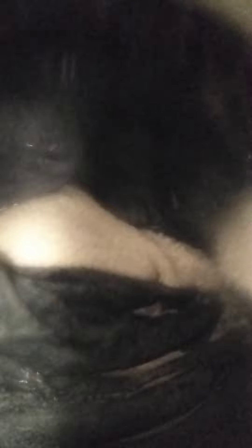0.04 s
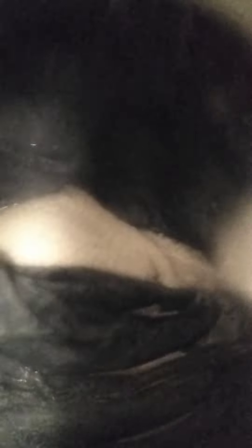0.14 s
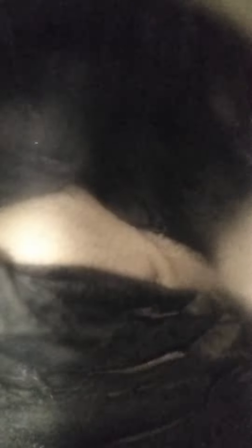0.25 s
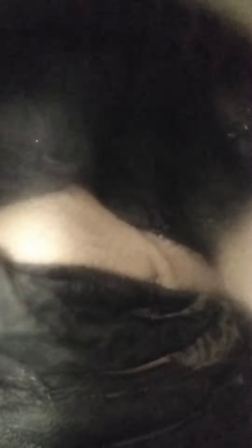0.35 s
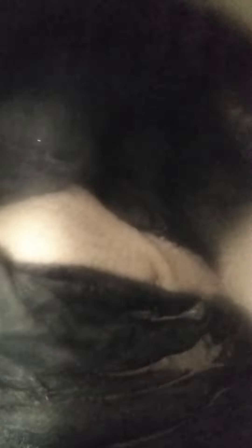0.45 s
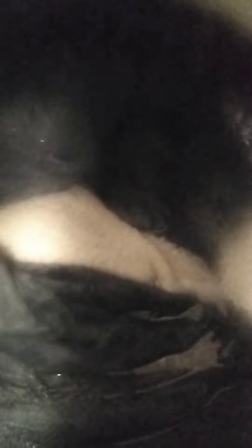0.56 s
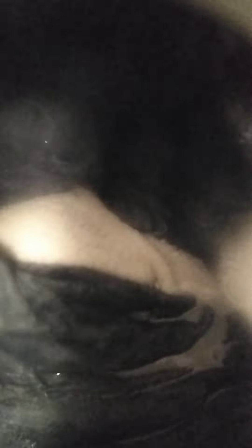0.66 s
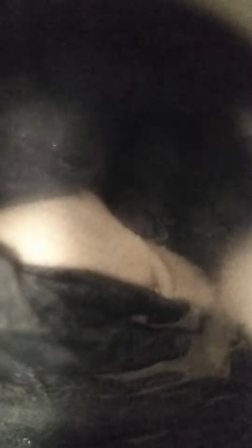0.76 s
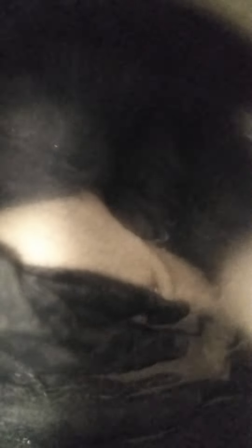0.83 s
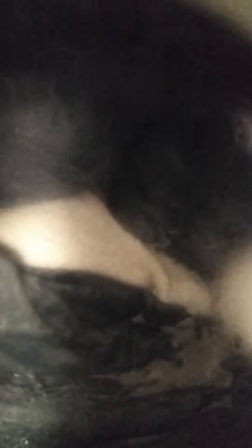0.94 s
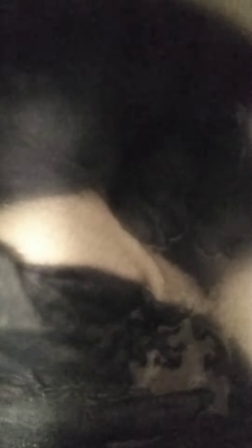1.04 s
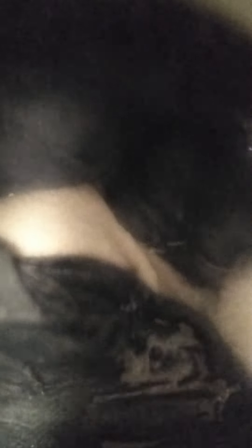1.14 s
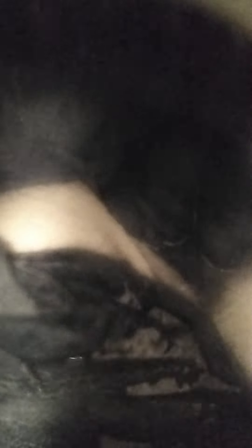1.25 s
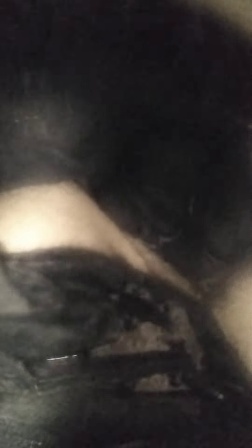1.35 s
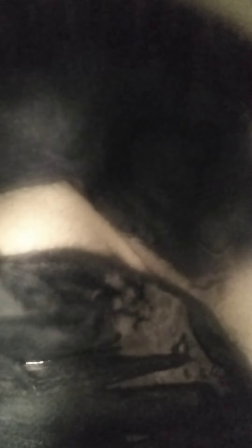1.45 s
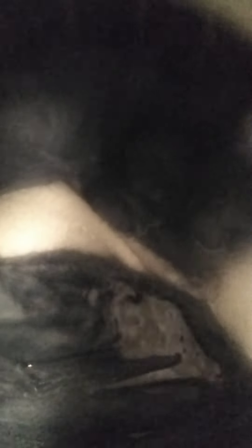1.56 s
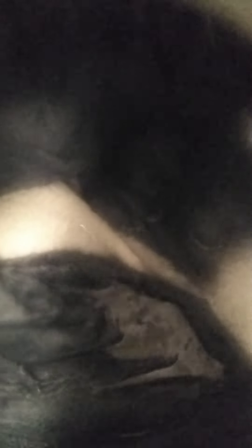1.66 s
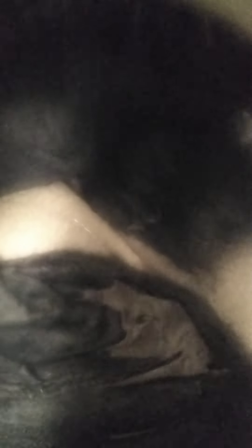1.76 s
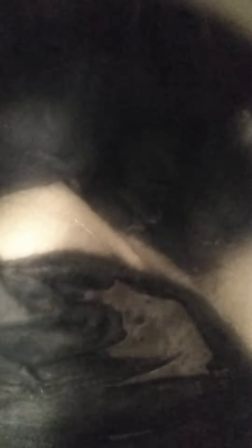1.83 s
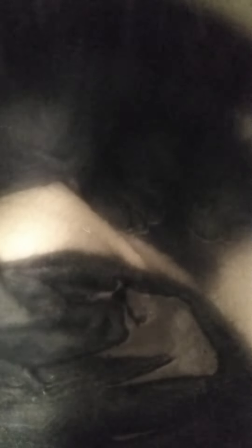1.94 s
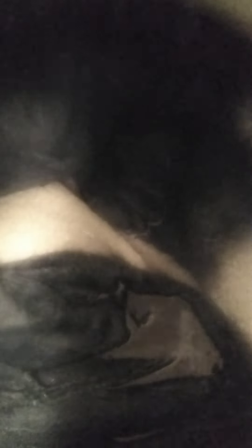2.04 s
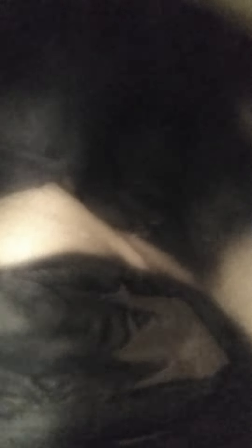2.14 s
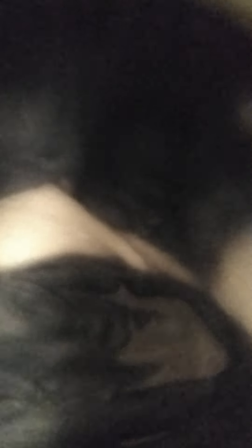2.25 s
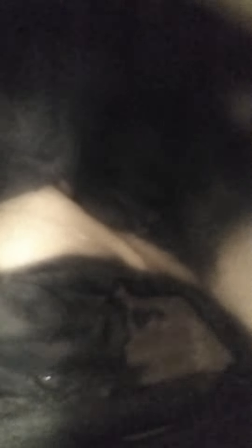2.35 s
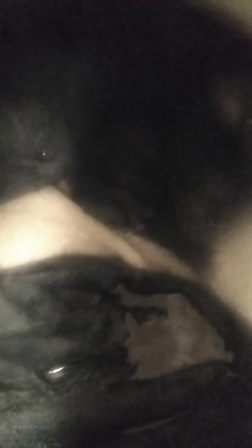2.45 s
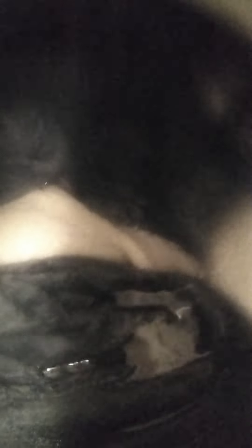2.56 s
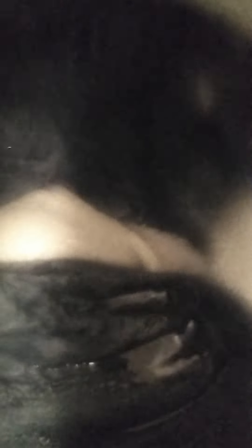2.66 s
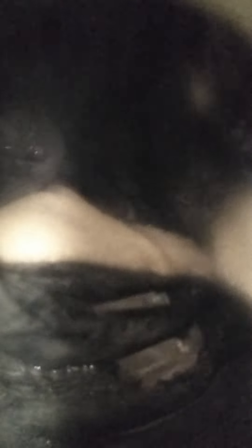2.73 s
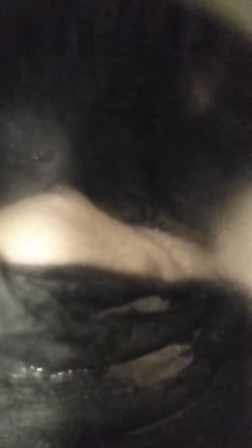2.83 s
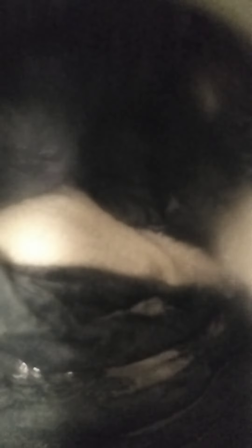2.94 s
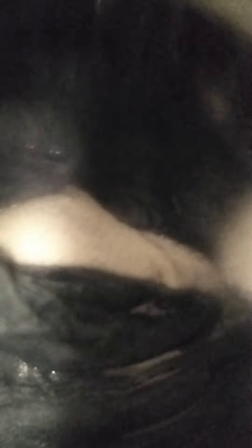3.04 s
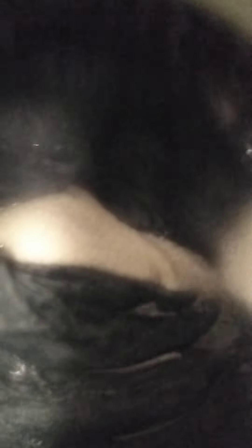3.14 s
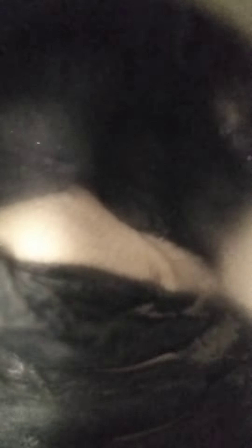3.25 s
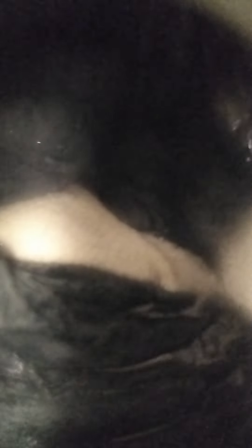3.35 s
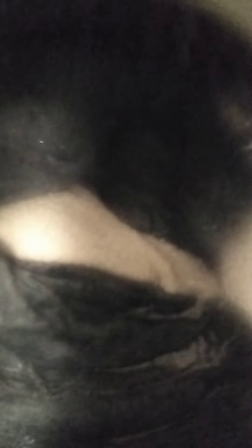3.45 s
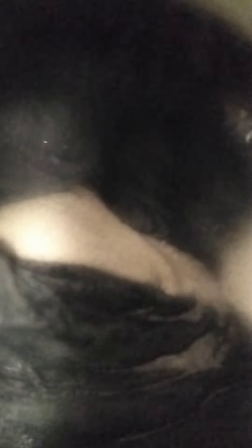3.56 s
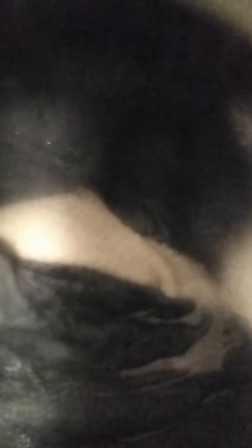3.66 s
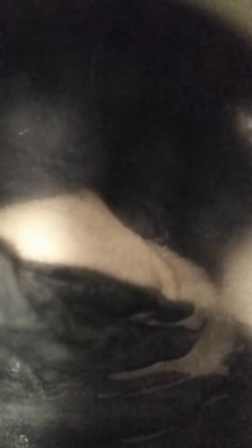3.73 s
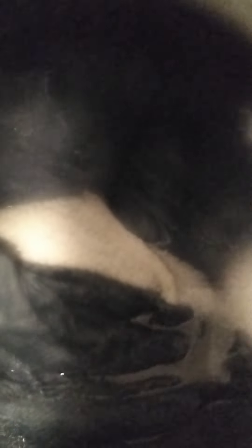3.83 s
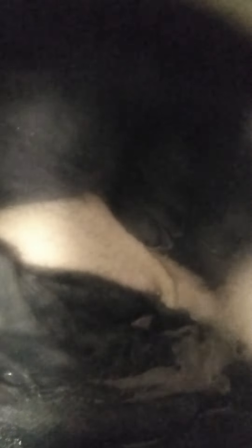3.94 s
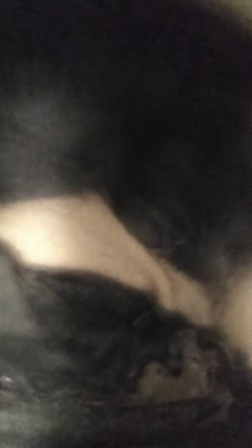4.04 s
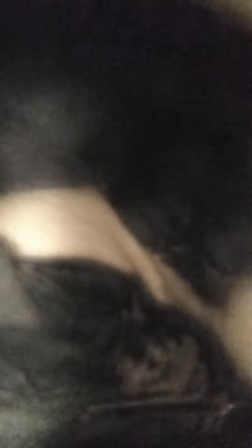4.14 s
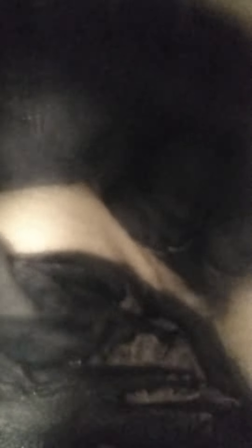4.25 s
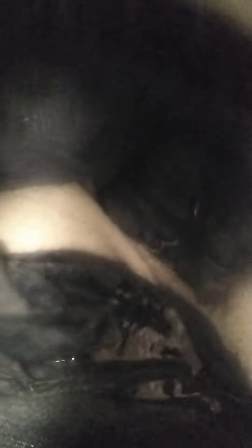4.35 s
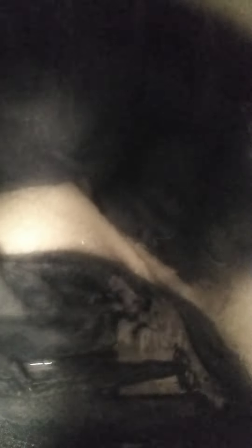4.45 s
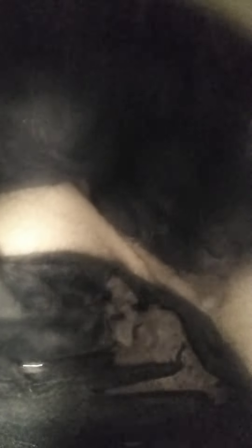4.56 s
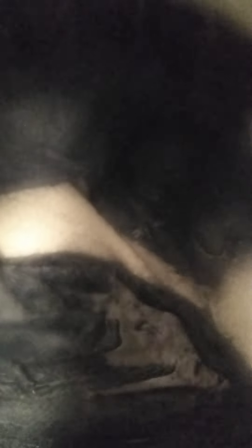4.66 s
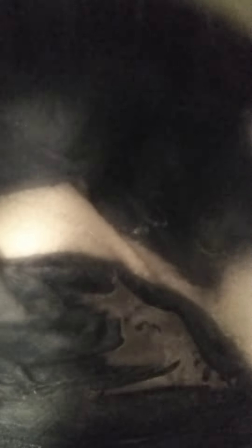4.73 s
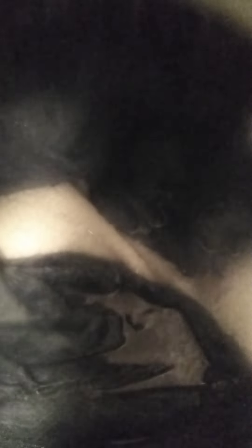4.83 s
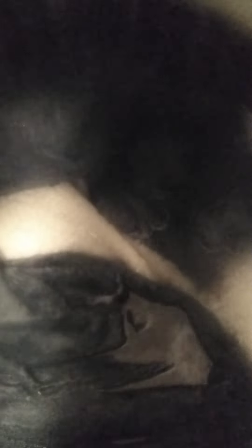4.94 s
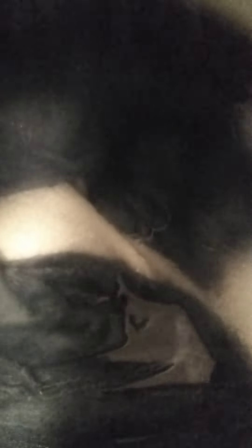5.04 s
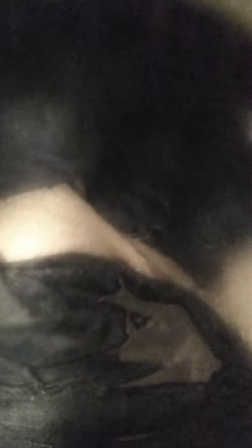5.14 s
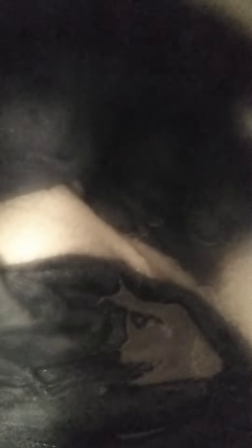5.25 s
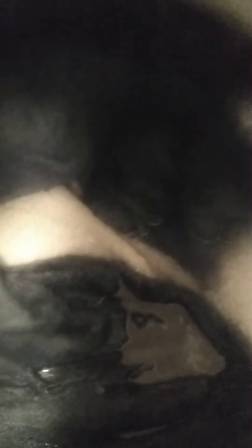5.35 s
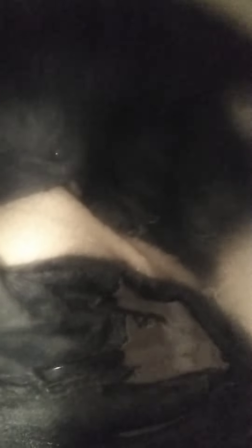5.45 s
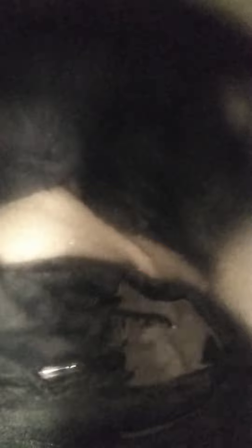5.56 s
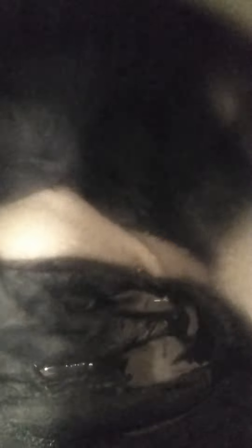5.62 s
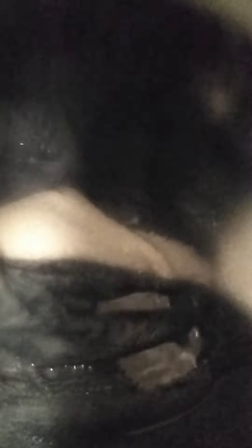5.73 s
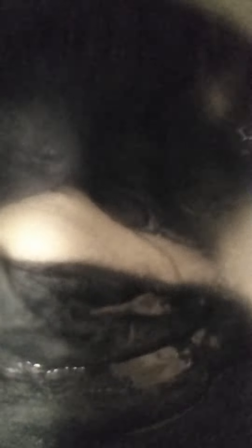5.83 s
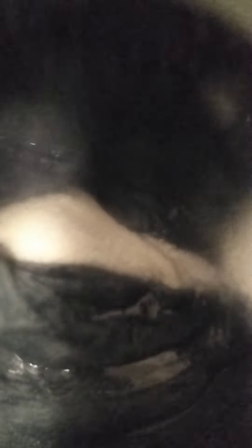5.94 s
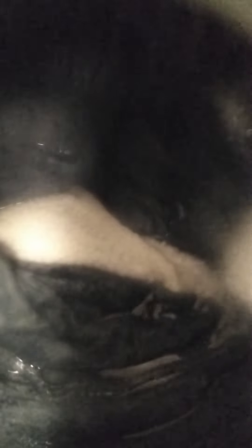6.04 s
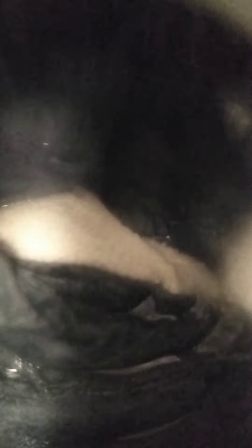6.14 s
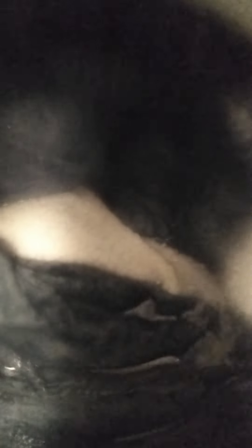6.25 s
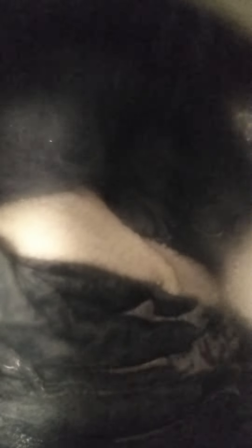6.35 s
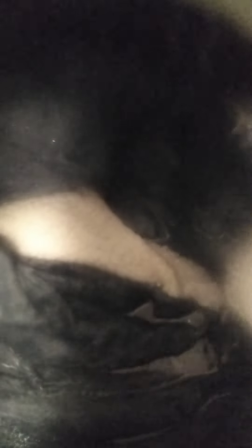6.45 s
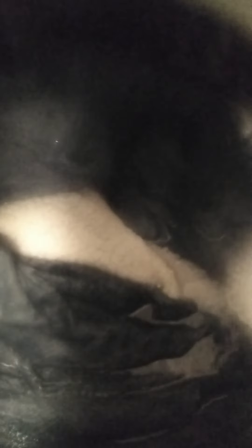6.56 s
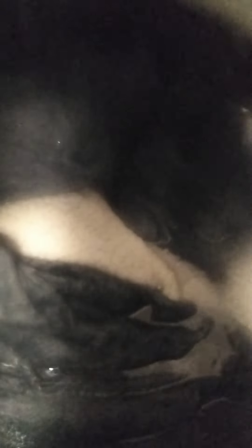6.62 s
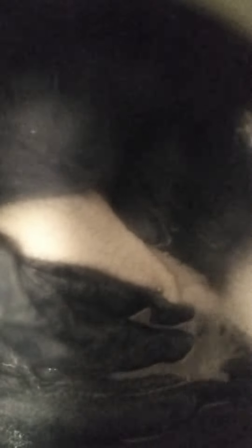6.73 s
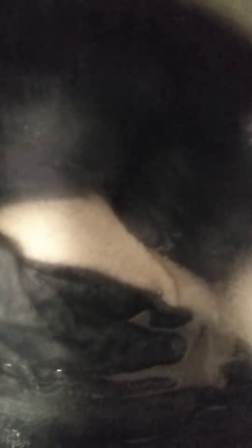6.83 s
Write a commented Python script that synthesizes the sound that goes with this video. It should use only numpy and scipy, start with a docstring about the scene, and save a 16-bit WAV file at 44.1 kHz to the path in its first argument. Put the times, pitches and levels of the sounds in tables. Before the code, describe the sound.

A washing machine agitates a wet blanket in regular strokes, its motor whirring and hooting between knocks while water churns and drips.

```python
"""A top-loading washer agitates a wet blanket, heard from just above the tub. Every 1.5 s the drive
takes up its slack with a few clacks, runs up to a hum that booms and hoots in the tub, coasts and hits
its stop as the load swings on. Belt and gears whirr; water churns, splashes and drips as ringing bubbles.
The inverter whistles while it drives, and the mains hums throughout over a faint room hiss.
Tub resonances and reflections off the steel drum colour most of the sounds."""
import sys
import numpy as np
from scipy import signal
from scipy.fft import rfft, irfft, next_fast_len
from scipy.io import wavfile
from scipy.ndimage import uniform_filter1d

SR = 44100
rng = np.random.default_rng(int(sys.argv[2]) if len(sys.argv) > 2 else 0)


def log_audio(samples):
    """Write samples as a 16-bit WAV file to the path given in sys.argv[1]."""
    # one column per channel
    frames = np.atleast_2d(samples).T
    # limit to full scale, then quantise
    limited = np.clip(frames, -1, 1)
    pcm = np.round(limited * 32767).astype(np.int16)
    wavfile.write(sys.argv[1], SR, pcm)


N = 303849
T = np.arange(N) / SR
FFT_SIZE = 2 * next_fast_len(N // 2 + 16384)
FREQS = np.maximum(np.arange(FFT_SIZE // 2 + 1) * SR / FFT_SIZE, 1)


def undb(db):
    """Decibels to gain."""
    return 10 ** (np.asarray(db) / 20)


def pan(db):
    """Stereo gains for a left-minus-right level difference."""
    return undb(np.array([[db], [-db]]) / 2)


def curve_db(points):
    """Join (Hz, dB) points on a log-frequency axis."""
    hz, db = np.transpose(points)
    return np.interp(np.log(FREQS), np.log(hz), db)


def peak(hz, width_hz):
    """Resonance curve of unit height."""
    return 1 / (1 + (2 * (FREQS - hz) / width_hz) ** 2)


def min_phase(db):
    """Causal filter with the given gain."""
    cepstrum = irfft(np.log(undb(db)))
    cepstrum[..., 1:FFT_SIZE // 2] *= 2
    cepstrum[..., FFT_SIZE // 2 + 1:] = 0
    return np.exp(rfft(cepstrum))


def colour(points):
    """Causal filter through (Hz, dB) points."""
    return min_phase(curve_db(points))


def filtered(x, gain):
    """Apply a frequency response."""
    return irfft(rfft(x, FFT_SIZE) * gain)[..., :N]


def shape(x, gain, band_hz):
    """Filter x, scaled so that unit white noise has unit level inside the band."""
    inside = (FREQS > band_hz[0]) & (FREQS < band_hz[1])
    power = np.mean(np.abs(gain) ** 2 * inside)
    return filtered(x, gain) / np.sqrt(power)


def walk(rate_hz):
    """Random steps, smoothed twice; spread near 1."""
    hold = int(SR / rate_hz)
    steps = np.repeat(rng.standard_normal(N // hold + 1), hold)
    return 1.3 * uniform_filter1d(uniform_filter1d(steps, hold), hold)[:N]


def noise(shared):
    """Stereo white noise with a share of its power in common."""
    return np.sqrt(shared) * rng.standard_normal(N) + np.sqrt(1 - shared) * rng.standard_normal((2, N))


def gate(start_s, end_s, fade_s):
    """Window with linear fades."""
    return np.clip((T - start_s) / fade_s, 0, 1) * np.clip((end_s - T) / fade_s, 0, 1)


def swell(centre_s, spread_s):
    """Gaussian envelope of unit height."""
    return np.exp(-((T - centre_s) / spread_s) ** 2)


def blows(times_s, levels_db, rise_s, t60_s, tail_db, tail_t60_s):
    """Envelope of blows, summed in power: quick rise, short ring, longer room tail."""
    t = T[:SR]
    decay = undb(-60 * t / t60_s) + undb(tail_db - 60 * t / tail_t60_s)
    blow = (1 - np.exp(-t / rise_s)) * decay
    power = np.zeros(N + SR)
    for start_s, db in zip(times_s, levels_db):
        i = int(start_s * SR)
        power[i:i + SR] += (undb(db) * blow) ** 2
    return np.sqrt(power[:N])


# Each row: frequency in Hz, width in Hz, left lift in dB, right lift in dB.
TUB_RESONANCES = [(95, 84, -0.5, 1.5), (199.6, 33, 9, -6), (295.5, 62, -2, 11), (335.4, 9, 0.5, 7.5),
                  (376.7, 40, 9, 6.5), (491, 180, 2, 6.5), (565, 63, 0, -1), (641, 17, -5, -11.5),
                  (688.5, 55, 5, 8), (797, 55, 1, 4), (989.2, 69, 2, 3.5), (1091, 90, 5, 7),
                  (1230, 9.6, 5, -10), (1448, 42, -2, 5.5), (1957, 76, 9, 2), (2452, 50, 9, 1),
                  (2660, 25, 7.5, 2.5), (3630, 74, 2.5, 2), (6330, 600, -6, 3)]

def tub_response(right_lag_s=0.00021):
    """Resonances of tub and cabinet; sound reaches the right side slightly later."""
    lift_db = sum(np.outer([left, right], peak(hz, width)) for hz, width, left, right in TUB_RESONANCES)
    return min_phase(lift_db) * np.exp(-2j * np.pi * np.outer([0, right_lag_s], FREQS))


def drum_echo(echo_db, t60_s, highpass_hz):
    """Direct sound plus dense treble reflections off the steel drum."""
    t = T[:SR // 2]
    tail = rng.standard_normal((2, len(t))) * undb(-60 * t / t60_s) * (t > 0.002)
    tail *= undb(echo_db) / np.sqrt(np.sum(tail ** 2) / 2)
    return 1 + rfft(tail, FFT_SIZE) / (1 + (highpass_hz / FREQS) ** 4)


# Each row: frequency in Hz, gain in dB.
HISS_SPECTRUM = [(25, 10), (60, 24.5), (190, 18.5), (285, 11), (320, 26), (355, 4), (450, 8), (800, 2),
                 (2000, -1.5), (6000, 1), (8500, -1), (12000, 0), (15500, -8)]
# Each row: frequency in Hz, left minus right in dB.
HISS_PAN = [(200, 2.5), (2500, 0), (7500, 1), (10000, 7.5), (15000, 7)]

def room_hiss(tub, level_db=-83):
    """Faint hiss of a quiet room, coloured by the open tub."""
    gain_db = curve_db(HISS_SPECTRUM) + np.outer([0.5, -0.5], curve_db(HISS_PAN))
    return shape(noise(shared=0.04), tub * undb(gain_db), band_hz=(8000, 14000)) * undb(level_db)


def mains_hum(hum_hz=121, level_db=-69):
    """Continuous mains hum, wavering slightly in pitch and level."""
    phase = 2 * np.pi * np.cumsum(hum_hz + 2.5 * walk(14)) / SR
    return np.sin(phase) * undb(level_db + 1.1 * walk(33)) * pan(3)


# Each row: start in seconds, level in dB.
WATER_SLAPS = [(0.06, -75.5), (0.109, -77), (1.203, -72.5), (1.248, -68.5), (1.34, -75.5), (1.592, -82),
               (2.68, -75), (2.786, -72), (2.865, -77.5), (3.065, -78), (3.114, -82), (3.372, -64),
               (4.256, -68.5), (4.47, -73.5), (4.624, -81), (5.655, -75), (5.721, -73), (5.783, -73.5),
               (5.852, -67.5), (5.899, -70.5), (6.102, -77)]
# Each row: frequency in Hz, gain in dB.
SPLASH_SPECTRUM = [(300, -19.5), (900, 3), (1600, 4.5), (2500, -2), (4000, 1.5), (6500, -5.5), (8500, -10),
                   (15000, -26.5)]

def splashes(drum, crackle_db=5, wash_db=-76, wash_after_s=0.7):
    """Water slaps off the blanket and crackles; a softer wash follows as the motor slows."""
    slap_s, slap_db = np.transpose(WATER_SLAPS)
    slaps = blows(slap_s, slap_db, rise_s=0.0055, t60_s=0.24, tail_db=-17.5, tail_t60_s=0.6)
    wash = sum(swell(start_s + wash_after_s, 0.16) for start_s in STROKE_STARTS_S) * undb(wash_db)
    spatter = noise(shared=0.24) * undb(crackle_db * walk(500)) * np.hypot(slaps, wash)
    return shape(spatter, drum * colour(SPLASH_SPECTRUM), band_hz=(1000, 8000)) * pan(-7)


def bubble(hz, cycles, glide=0.035):
    """A tiny bubble swells in, rings and rises in pitch as it dies."""
    t = T[:2048]
    age = np.minimum(t * hz / cycles, 1)
    phase = 2 * np.pi * np.cumsum(hz * (1 + glide * age)) / SR
    envelope = (1 - np.exp(-t * hz / 3)) * undb(-60 * age) * (age < 1)
    return np.sin(phase) * envelope


# Each row: start in seconds, relative level in dB, pitch in Hz.
DROPS = [(0.16, -55, 2840), (0.4201, -58.5, 6150), (0.932, -53.5, 6284), (1.127, -49.5, 6600),
         (1.205, -48.5, 3450), (1.209, -57, 5170), (1.249, -53, 4900), (1.305, -47, 3350),
         (1.3443, -52, 5140), (1.6214, -53, 3140), (2.438, -53, 6130), (2.4432, -51, 3298),
         (2.4843, -51.5, 5610), (2.6768, -50, 5300), (2.7237, -52, 5700), (2.755, -50.5, 6400),
         (2.781, -50, 5730), (3.0988, -56, 5800), (3.1288, -58.5, 3570), (3.9798, -54, 5096),
         (4.2113, -59, 6400), (4.2363, -51, 5300), (4.256, -53, 5950), (4.265, -50, 3720),
         (4.437, -59, 3320), (4.4892, -55, 3623), (5.515, -50, 3910), (5.655, -51, 2950),
         (5.7178, -47, 3570), (5.806, -55, 4000), (5.8591, -48.5, 4050), (6.108, -63, 2960)]

def drips(gain_db=-6, drop_pan_db=-11.5, spray_s=0.019, fizz_s=0.071, trickle_after_s=0.83, fine_hz=3570):
    """Drops ping and throw a spray of bubbles; slaps fizz, and a fine trickle follows each stroke."""
    bubbles = []  # start in s, level in dB, pitch in Hz, pan in dB, cycles
    for start_s, db, hz in DROPS:
        bubbles.append((start_s, db, hz, drop_pan_db, 30))
        for wait, pitch in rng.random((16, 2)):
            spray_hz = min(hz * 2 ** (1.3 * (pitch - 0.4)), 7000)
            bubbles.append((start_s + spray_s * wait ** 2, db - 9, spray_hz, drop_pan_db, 12))
    for start_s, db in WATER_SLAPS:
        for wait, size, pitch in np.clip(rng.standard_normal((8, 3)), -2, 2):
            onset_s = start_s + fizz_s * (wait + 2) / 4
            bubbles.append((onset_s, db + 9 + 1.5 * size, fine_hz * np.exp(0.35 * pitch), -9, 16))
    for start_s in STROKE_STARTS_S:
        for wait, size, pitch, side in np.clip(rng.standard_normal((120, 4)), -2, 2):
            onset_s = start_s + trickle_after_s + 0.059 * wait
            bubbles.append((onset_s, -79 + 1.5 * size, fine_hz * np.exp(0.35 * pitch), 4 * side - 8, 18))
    out = np.zeros((2, N + 3 * SR))
    for start_s, db, hz, pan_db, cycles in bubbles:
        ping = bubble(hz, cycles) * undb(db + gain_db)
        i = int(start_s * SR)
        out[:, i:i + len(ping)] += ping * pan(pan_db)
    return filtered(out[:, :N], drum_echo(echo_db=11, t60_s=0.097, highpass_hz=900))


def whistle(hz, width_hz):
    """Narrow, wavering spectral line."""
    phase = 2 * np.pi * hz * T
    return np.sin(phase) * walk(width_hz) + np.cos(phase) * walk(width_hz)


# Each row: frequency in Hz, width in Hz, relative level in dB.
COIL_TONES = [(2880, 110, -6.5), (5650, 120, 1.5), (6160, 170, -3.5)]
# Each row: centre in seconds, relative level in dB.
COIL_SWELLS = [(3.39, -78), (4.76, -81), (6.45, -81)]

def coils(gain_db=-89.5, idle_share=0.34, flicker_db=3):
    """Coils sing while powered, louder with motor speed, and flare up now and then."""
    powered = sum(gate(start_s - 0.15, start_s + 0.85, fade_s=0.07) for start_s in STROKE_STARTS_S)
    speed = sum(motor_speed(start_s) for start_s in STROKE_STARTS_S)
    flares = sum(swell(centre_s, 0.019) * undb(db) for centre_s, db in COIL_SWELLS)
    current = (idle_share * powered + speed) * undb(gain_db) + flares
    tones = sum(whistle(hz, width_hz) * undb(db) for hz, width_hz, db in COIL_TONES)
    return tones * current * undb(flicker_db * walk(27)) * pan(-7.5)


# Each row: start in seconds, relative levels of clack and tub thud in dB.
SLACK_KNOCKS = [(0.245, -56, -60), (0.312, -45, -62), (0.348, -58, -41.5), (1.8, -73, -69),
                (1.863, -63, -50), (1.917, -73.5, -48), (2, -59.5, -41.5), (3.245, -55, -68),
                (3.32, -44, -53.5), (3.357, -46, -36), (4.75, -59.5, -65.5), (4.799, -49.5, -48),
                (4.986, -64, -42), (6.297, -54, -54.5), (6.33, -63, -40.5)]
# Each row: start in seconds, relative levels of clack, tub thud, load surge and coupling ring in dB,
# lead of the glancing touch in seconds.
END_STOPS = [(1.095, -37.5, -40.5, -54, -33.5, .025), (2.594, -35, -40, -49, -31, 0.022),
             (4.094, -37.5, -41, -54, -37, 0.026), (5.597, -36, -47, -40.5, -32, 0.022)]
# Each row: frequency in Hz, gain in dB.
CLACK_SPECTRUM = [(60, -14), (400, -1), (750, -2), (1150, -0.5), (1600, -11), (2400, -22), (3100, -27.5),
                  (5000, -44.5), (10000, -75)]
CRACK_SPECTRUM = [(800, -28), (2000, 2), (3000, 2), (4500, -6.5), (6300, -14), (8000, -35), (15000, -57)]

def clacks(drum, scuff_top_hz=2900):
    """The coupling scuffs as it takes up slack, then glances off and hits its stop with a crack."""
    slack_s, slack_db, _ = np.transpose(SLACK_KNOCKS)
    stop_s, stop_db, _, _, _, lead_s = np.transpose(END_STOPS)
    glance_s = stop_s - lead_s
    scuff = blows(slack_s - 0.003, slack_db, rise_s=0.0058, t60_s=0.15, tail_db=-22.5, tail_t60_s=0.4)
    clack_decay = dict(t60_s=0.11, tail_db=-21.5, tail_t60_s=0.49)
    clack = np.hypot(blows(stop_s - 0.003, stop_db + 2.5, rise_s=0.0035, **clack_decay),
                     blows(glance_s - 0.003, stop_db + 0.5, rise_s=0.0052, **clack_decay))
    crack_decay = dict(t60_s=0.054, tail_db=-15, tail_t60_s=0.45)
    crack = np.hypot(blows(stop_s - 0.002, stop_db - 15, rise_s=0.004, **crack_decay),
                     blows(glance_s - 0.002, stop_db - 21, rise_s=0.0052, **crack_decay))
    rattle = noise(shared=0.39) * undb(2 * walk(300))
    contact = rattle * clack + filtered(rattle * scuff, 1 / (1 + (FREQS / scuff_top_hz) ** 8))
    dull = shape(contact, drum * colour(CLACK_SPECTRUM), band_hz=(700, 3000))
    bright = shape(noise(shared=0.117) * crack, drum * colour(CRACK_SPECTRUM), band_hz=(2500, 7000))
    return dull * pan(-0.72) + bright * pan(-1.5)


# Each row: start in seconds, relative level in dB.
BLANKET_FLOPS = [(1.499, -65), (2.967, -64.5), (3.109, -68), (4.712, -72), (6.249, -68)]
# Each row: frequency in Hz, gain in dB.
THUD_SPECTRUM = [(30, -31.5), (90, -5.5), (170, -8), (300, 7), (450, 3.5), (650, -21), (1500, -53.5),
                 (5000, -64)]

def thuds(drum, gain_db=1, glance_db=-6):
    """The whole tub thuds under knocks, stops, glancing touches and flopping folds of blanket."""
    hits = [(start_s, db) for start_s, _, db in SLACK_KNOCKS] + list(BLANKET_FLOPS)
    for stop_s, _, db, _, _, lead_s in END_STOPS:
        hits += [(stop_s, db), (stop_s - lead_s, db + glance_db)]
    hit_s, hit_db = np.transpose(hits)
    thud = blows(hit_s - 0.003, hit_db + gain_db, rise_s=0.002, t60_s=0.14, tail_db=-20, tail_t60_s=0.79)
    return shape(noise(shared=0.54) * thud, drum * colour(THUD_SPECTRUM), band_hz=(220, 520)) * pan(-11)


# Each row: frequency in Hz, relative level in dB, T60 in seconds.
COUPLING_MODES = [(280, -6, 0.041), (530, -9.5, 0.076), (752, 1, 0.056), (1083.6, 1.5, 0.03),
                  (1270, 1, 0.018), (1960, -8.5, 0.037), (2340, -15, 0.045), (2992, -11, 0.026)]

def coupling_ring(drum, rise_s=0.003, detune=0.012):
    """The coupling rings briefly: hard at each stop, lightly when taking up slack."""
    t, out = T[:SR // 8], np.zeros(N)
    attack = 1 - np.exp(-(t / rise_s) ** 2)
    strikes = [(start_s, ring_db - 6) for start_s, _, _, _, ring_db, _ in END_STOPS]
    strikes += [(start_s, clack_db - 8) for start_s, clack_db, _ in SLACK_KNOCKS]
    for start_s, db in strikes:
        i = int(start_s * SR)
        for k, (hz, mode_db, t60_s) in enumerate(COUPLING_MODES):
            phase = 2 * np.pi * hz * (1 + detune * rng.standard_normal()) * t
            envelope = attack * undb(db + mode_db - 60 * t / t60_s)
            out[i:i + len(t)] += (-1) ** k * np.sin(phase) * envelope
    return filtered(out, drum) * pan(-4.5)


def stirring(from_s=0.23, until_s=0.66, rise_db_per_s=108, fall_db_per_s=62):
    """How hard the agitator moves the load: each stroke rises, holds and falls away."""
    stir = np.zeros(N)
    for start_s in STROKE_STARTS_S:
        before_s = np.maximum(start_s + from_s - T, 0)
        after_s = np.maximum(T - start_s - until_s, 0)
        stir += undb(-rise_db_per_s * before_s - fall_db_per_s * after_s)
    return stir


# Each row: frequency in Hz, gain in dB.
RUMBLE_SPECTRUM = [(20, -28), (45, -12.5), (80, -5), (115, 7.5), (170, -15.5), (300, -27.5), (800, -65.5)]

def load_rumble(tub, stir_db=-55, knee_db=-34, still_db=-70):
    """The wet blanket rumbles on the tub: stirred by strokes, rocked by knocks, swinging after stops."""
    knock_s, _, thud_db = np.transpose(SLACK_KNOCKS)
    stop_s, _, _, surge_db, _, _ = np.transpose(END_STOPS)
    rock_db = np.minimum(thud_db, knee_db + 0.18 * (thud_db - knee_db)) - 9
    rocking = blows(knock_s, rock_db, rise_s=0.035, t60_s=0.54, tail_db=-32, tail_t60_s=0.6)
    swing = blows(stop_s, surge_db, rise_s=0.0061, t60_s=0.6, tail_db=-20.5, tail_t60_s=0.77)
    motion = np.hypot(stirring() * undb(stir_db), rocking) + swing
    envelope = motion ** 2 / (motion + undb(still_db))  # dies out as the load comes to rest
    rumble = noise(shared=0.73) * envelope
    return shape(rumble, tub * colour(RUMBLE_SPECTRUM), band_hz=(50, 140)) * pan(-5.5)


# Each row: frequency in Hz, gain in dB.
CHURN_SPECTRUM = [(80, -28), (170, -2), (280, 3), (420, -3), (600, -11.5), (1200, -26.5), (2500, -48.5),
                  (8000, -55.5)]

def water_churn(tub, stir_db=-49, wave_db=-47, lumps_db=1.5):
    """Water churns round the blanket in lumps, driven by strokes, knocks and stops."""
    knock_s, _, thud_db = np.transpose(SLACK_KNOCKS)
    stop_s = [start_s for start_s, *_ in END_STOPS]
    jolt = blows(knock_s, thud_db - 13, rise_s=0.01, t60_s=0.42, tail_db=-26.5, tail_t60_s=0.9)
    wave = blows(stop_s, [wave_db] * len(stop_s), rise_s=0.003, t60_s=0.36, tail_db=-27, tail_t60_s=0.4)
    motion = np.hypot(stirring() * undb(stir_db), jolt) + wave
    slosh = noise(shared=0.56) * motion * undb(lumps_db * (walk(70) + walk(14)))
    return shape(slosh, tub * colour(CHURN_SPECTRUM), band_hz=(170, 280)) * pan(-5.5)


# Each row: start in seconds, relative levels of hum, octave and whirr in dB, gear lead in seconds,
# late-stroke hum change in dB, hum change just past top speed in dB, overspeed in Hz.
AGITATOR_STROKES = [(0.311, -24.5, -33, -45, 0, 2, -3, 0), (1.824, -29.5, -30, -43.5, 0.024, -1, 5.5, 4),
                    (3.321, -24.5, -33, -44.5, 0.00083, -1.5, -4, -0.5),
                    (4.833, -30, -29.5, -44, 0.021, 3, 7.5, 5), (6.329, -23, -33, -45, 0.011, -5, -6, -1)]
STROKE_STARTS_S = [start_s for start_s, *_ in AGITATOR_STROKES]
# Each row: time into the stroke in seconds, motor pitch in Hz, effort in dB.
STROKE_PROFILE = [(0, 29.5, -37), (0.121, 117, -23), (0.165, 164, -2.5), (0.21, 228, -9), (0.285, 270, -22),
                  (0.335, 318.8, 1.5), (0.368, 334, -4), (0.421, 327.7, 3), (0.447, 304, -12),
                  (0.565, 291.3, -9.5), (0.619, 328.4, -10.5), (0.66, 217.7, -20), (0.76, 111.8, -43)]

def motor_speed(start_s, full_speed_hz=345.5, coast_s=0.03):
    """Motor speed over one stroke, as a share of full speed."""
    profile_s, hz, _ = np.transpose(STROKE_PROFILE)
    running = gate(start_s, start_s + profile_s[-1] + coast_s, fade_s=coast_s)
    return np.interp(T - start_s, profile_s, hz) / full_speed_hz * running


def motor(tub, boom_hz=320, boom_width_hz=38, late_s=0.5, crest_s=0.393):
    """The motor tone booms as it crosses the tub's main resonance; its octave sweeps the others."""
    profile_s, hz, effort_db = np.transpose(STROKE_PROFILE)
    hum, octave = np.zeros(N), np.zeros(N)
    wobble = 1 + 0.0086 * walk(60)
    for start_s, hum_db, octave_db, _, _, late_db, crest_db, overspeed_hz in AGITATOR_STROKES:
        pitch_hz = (np.interp(T - start_s, profile_s, hz) + overspeed_hz) * wobble
        phase = 2 * np.pi * np.cumsum(pitch_hz) / SR
        effort = undb(np.interp(T - start_s, profile_s, effort_db + late_db * (profile_s > late_s)))
        effort *= gate(start_s, start_s + profile_s[-1], fade_s=0.03)
        crest = swell(start_s + crest_s, 0.053)  # the load bears on the motor
        hum += np.sin(phase) * effort * undb(hum_db + crest_db * crest)
        octave += np.sin(2 * phase) * effort * undb(octave_db - 13)
    hum *= 1 + 0.084 * walk(110)
    octave *= 1 + 0.81 * walk(160)
    resonance = 1 / (1 + 1j * (FREQS / boom_hz - boom_hz / FREQS) * boom_hz / boom_width_hz) ** 2
    radiation_db = curve_db([(150, -16.5), (340, 3), (450, 7.5), (560, 1),
                             (630, -12.5), (685, -3.5), (740, -5)])
    return filtered(hum, resonance) * pan(-17) + filtered(octave, tub * undb(radiation_db))


# Each row: frequency in Hz, width in Hz, lift in dB.
GEARBOX_RESONANCES = [(1420, 430, 2.5), (2930, 200, 2), (3660, 190, 6.5), (4110, 140, 4.5), (5500, 270, 6)]
# Each row: frequency in Hz, gain in dB.
WHIRR_SPECTRUM = [(60, -30), (200, -21), (400, 2.5), (750, 4.5), (1150, -2), (1500, -15), (2200, -24),
                  (4000, -33.5), (6000, -41), (8000, -56), (15000, -69.5)]

def gears(drum, gain_db=1.5):
    """Belt and gear teeth rub unevenly and shake the cabinet; amplitude goes as speed cubed."""
    effort = sum(undb(whirr_db) * motor_speed(start_s - lead_s) ** 3
                 for start_s, _, _, whirr_db, lead_s, *_ in AGITATOR_STROKES)
    rubbing = noise(shared=0.43) * effort * undb(gain_db + walk(220) + walk(30))
    gearbox_db = sum(db * peak(hz, width_hz) for hz, width_hz, db in GEARBOX_RESONANCES)
    pan_db = curve_db([(300, -0.5), (2500, -1.5), (5000, -5)])
    body = min_phase(curve_db(WHIRR_SPECTRUM) + gearbox_db + np.outer([0.5, -0.5], pan_db))
    return shape(rubbing, drum * body, band_hz=(650, 1400))


# Each row: start in seconds, relative level in dB, T60 in seconds.
HEAVY_BLOWS = [(0.351, -47, 0.2), (2.5943, -20, 0.03), (3.357, -32, 0.26)]
# Each row: frequency in Hz, relative level in dB.
BOOM_MODES = [(307, -1), (377, -6.5), (517, -13)]

def tub_booms(tub, gain_db=-4, rise_s=0.0019):
    """Heavy blows ring the tub's low modes; with the load against the wall they die at once."""
    t, out = T[:SR // 2], np.zeros(N)
    ring = sum(np.sin(2 * np.pi * hz * t) * undb(db) for hz, db in BOOM_MODES)
    ring *= 1 - np.exp(-t / rise_s)
    for start_s, db, t60_s in HEAVY_BLOWS:
        i = int(start_s * SR)
        out[i:i + len(t)] += ring * undb(db + gain_db - 60 * t / t60_s)
    return filtered(out, tub) * pan(-6.5)


def inverter(gain_db=-80):
    """The inverter's switching whistle swells with motor speed."""
    driving = sum(motor_speed(start_s) * gate(start_s + 0.13, start_s + 0.68, fade_s=0.1)
                  for start_s in STROKE_STARTS_S)
    carrier = whistle(15730, 260) + 0.5 * whistle(15520, 350)
    return carrier * driving * undb(gain_db) * pan(17)


# Each row: centre in seconds, level in dB, spread in seconds.
WATER_SHEETS = [(0.77, -73.5, 0.12), (2.29, -73.5, .08), (3.79, -72, 0.084), (5.285, -65, 0.043),
                (6.79, -71.5, 0.063)]
# Each row: frequency in Hz, gain in dB.
SWISH_SPECTRUM = [(600, -16.5), (1700, 2.5), (2800, 0), (4000, 1.5), (6300, -8.5), (8000, -16.5),
                  (15000, -34)]

def swishes(drum, grain_db=3.5):
    """At the height of each stroke, water slides off the blanket in a grainy swish."""
    flow = sum(swell(centre_s, spread_s) * undb(db) for centre_s, db, spread_s in WATER_SHEETS)
    spatter = noise(shared=0.2) * flow * undb(grain_db * walk(400))
    return shape(spatter, drum * colour(SWISH_SPECTRUM), band_hz=(1500, 7000)) * pan(-2.5)


# Each row: start in seconds, level in dB, nominal pitch in Hz.
RESONANCE_BLIPS = [(0.925, -34.5, 327), (1.985, -37, 321), (2.425, -34.5, 354), (2.5, -38, 329),
                   (3.929, -34, 329), (3.996, -45, 357), (4.99, -42, 341), (5.431, -33.5, 347.8)]

def motor_blips(length_s=0.043, glide=0.13):
    """Short, hollow, rising hoots as the motor tone crosses the tub's resonance."""
    out = np.zeros(N)
    for start_s, db, hz in RESONANCE_BLIPS:
        age = np.clip((T - start_s) / length_s, 0, 1)
        phase = 2 * np.pi * hz * length_s * age * (1 + glide * (age - 0.5))
        out += np.sin(phase) * np.sin(np.pi * age) ** 2 * undb(db)
    return out * pan(-10)


def scene():
    """Sum all sources; most share the tub's resonances, some also the drum's echo."""
    tub = tub_response()
    drum = tub * drum_echo(echo_db=-1, t60_s=0.14, highpass_hz=700)
    drive = motor(tub) + gears(drum) + motor_blips()
    impacts = clacks(drum) + thuds(drum) + coupling_ring(drum) + tub_booms(tub)
    wash = splashes(drum) + drips() + load_rumble(tub) + water_churn(tub) + swishes(drum)
    electrics = mains_hum() + coils() + inverter()
    return drive + impacts + wash + electrics + room_hiss(tub)


def record(dry):
    """Steep elliptic low-pass at 15850 Hz."""
    return signal.sosfilt(signal.ellip(12, 0.2, 80, 15850, fs=SR, output="sos"), dry)


dry = scene()
out = record(dry)
log_audio(out)
```